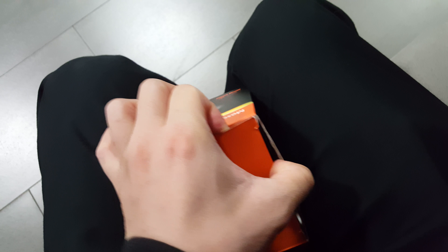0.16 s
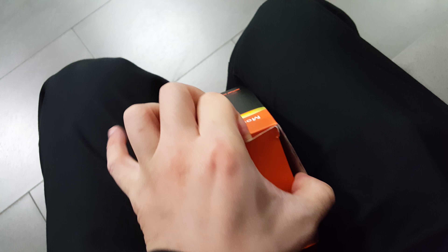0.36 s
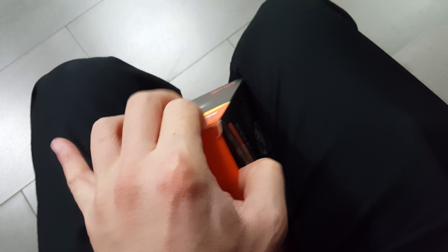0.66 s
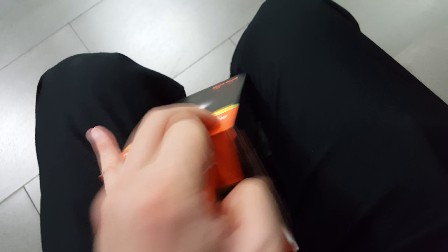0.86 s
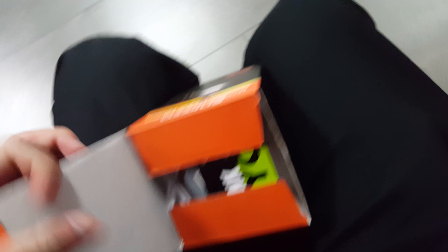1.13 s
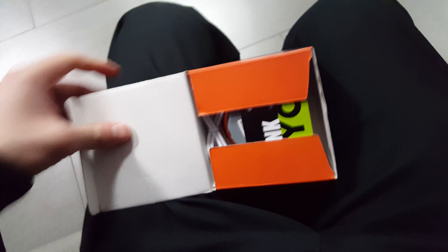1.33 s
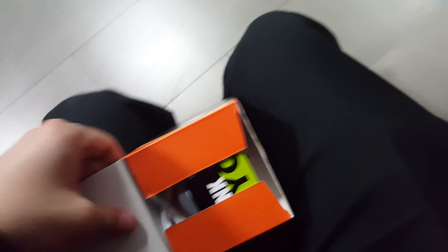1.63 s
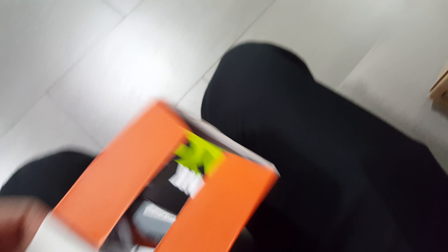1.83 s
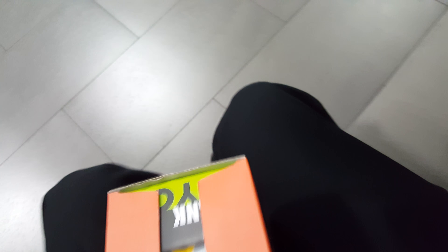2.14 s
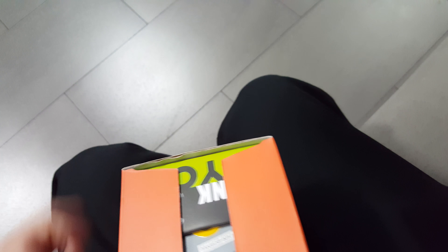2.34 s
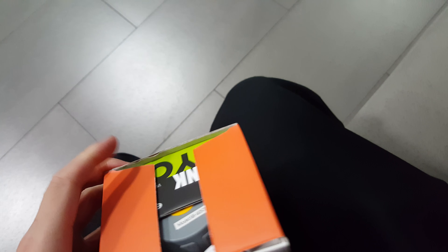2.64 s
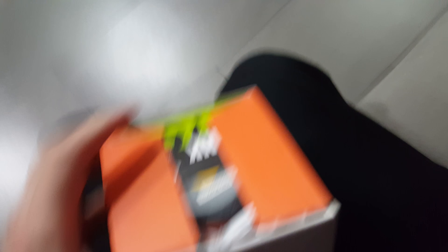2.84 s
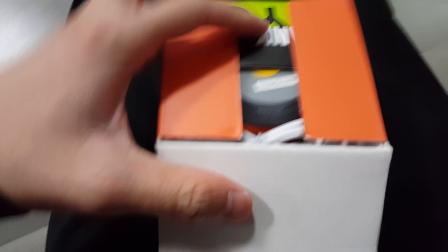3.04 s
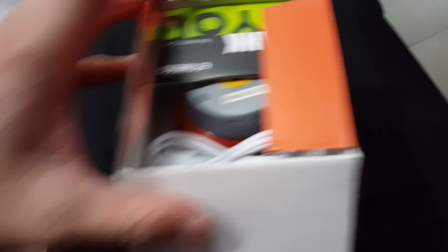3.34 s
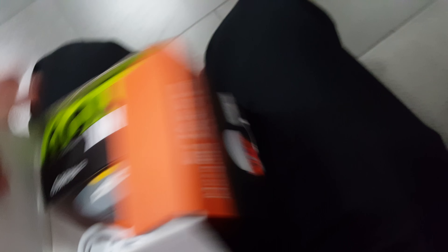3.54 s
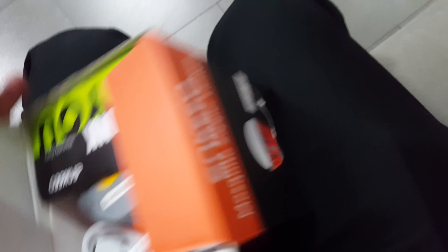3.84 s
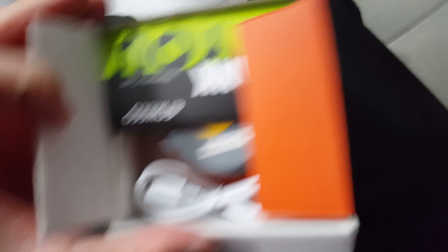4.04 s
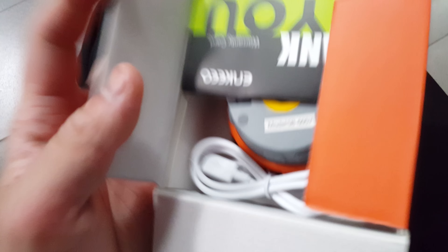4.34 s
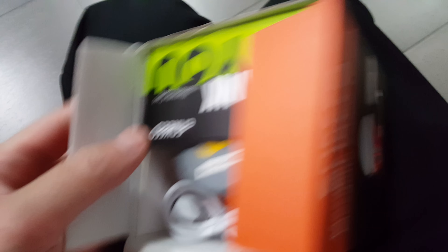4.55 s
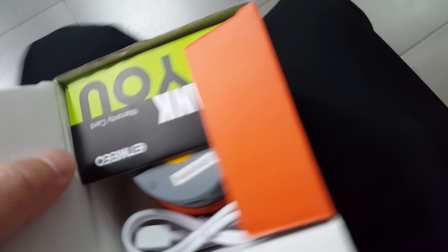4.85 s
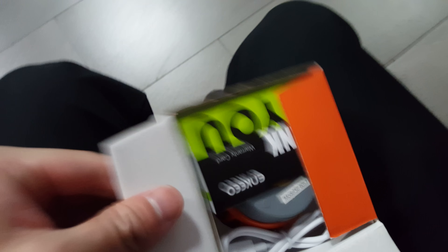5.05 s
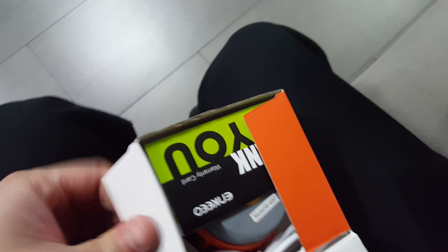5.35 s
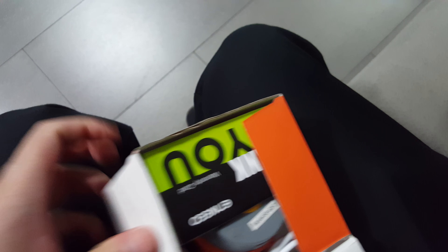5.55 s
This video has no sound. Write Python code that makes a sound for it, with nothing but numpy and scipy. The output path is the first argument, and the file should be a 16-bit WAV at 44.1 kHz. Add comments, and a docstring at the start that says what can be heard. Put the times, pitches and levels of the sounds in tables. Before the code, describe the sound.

Fingers rub and flick stiff card flaps in a quiet room, a dense burst near one second, then scattered scuffs, clicks and a fold creak.

```python
"""A small cardboard box is opened on the lap, close to two microphone ports.
From the start fingers and flaps rub the card (dense slips and noise coloured by the card) over a quiet room
rumble (filtered noise). From 0.1 s edges scuff, and flaps slip, snap and knock (noisy forces that ring modes).
From 0.9 s edges squeak now and then (gliding tones); at 5.3 s a fold creaks (a train of jolts), then
a few last knocks fall. A short dull reverberation (sparse taps) follows all the near sounds."""
import sys
import numpy as np
from scipy import signal
from scipy.fft import rfft, irfft
from scipy.io import wavfile
from scipy.ndimage import uniform_filter1d

SR = 44100
rng = np.random.default_rng(int(sys.argv[2]) if len(sys.argv) > 2 else 0)


def generate_wav(signal):
    """Clip the signal to [-1, 1] and save it as 16-bit WAV at the path in sys.argv[1]."""
    frames = np.transpose(np.atleast_2d(signal))
    scaled = np.clip(frames, -1, 1) * 32767
    pcm = np.round(scaled).astype(np.int16)
    wavfile.write(sys.argv[1], SR, pcm)


N = 250929  # length in samples
SPLIT_HZ = 2500  # border of snap and crack; the drifting balance of the rub is full above it
LEAD_S = 0.00014  # the left port is nearer
# borders of the broad bands: edge [Hz]
BAND_EDGES_HZ = (400, 1200, 5000)


def gain_of(db):
    """Level law: decibels to amplitude."""
    return 10 ** (np.asarray(db) / 20)


def evened(x):
    """Normalisation: scales to rms 1."""
    return x / np.sqrt(np.mean(x ** 2) + 1e-20)


def read(points, hz):
    """Interpolation of a spectrum on a log-frequency axis."""
    f, value = np.transpose(points)
    return np.interp(np.log(hz + 1), np.log(f + 1), value)


def add(mix, s, sound):
    """Superposition: mixes a sound in at time s."""
    part = mix[:, round(s * SR):][:, :sound.shape[1]]
    part += sound[:, :part.shape[1]]


def shaped(x, field_db, size=256):
    """Time-varying filtering: a level field over frequency and time weights the short-time spectrum."""
    overlap = size * 3 // 4
    hz, t, z = signal.stft(x, SR, nperseg=size, noverlap=overlap)
    _, y = signal.istft(z * gain_of(field_db(hz, t)), SR, nperseg=size, noverlap=overlap)
    return y[..., :N]


def patches(shape, wide, long):
    """Smoothed randomness: blotches over frequency and time, rms 1."""
    z = rng.standard_normal(shape[::-1]).T
    z = uniform_filter1d(z, max(round(wide), 1), 0)
    return evened(uniform_filter1d(z, max(round(long), 1), 1))


# likeness of the two ports: pitch_hz [Hz], likeness [0 to 1]
PORT_LIKENESS = [(60, 0.97), (300, 0.96), (700, 0.88), (1400, 1), (3000, 0.05), (6000, 0.033),
                 (15000, 0.17)]


def pair(x):
    """Coherence: two noises become two ports, alike in the bass and mostly unlike in the treble."""
    n = x.shape[1]
    same = np.clip(read(PORT_LIKENESS, np.fft.rfftfreq(n, 1 / SR)), 0, 1)
    a, b = rfft(x)
    return irfft(np.array([a, same * a + np.sqrt(1 - same ** 2) * b]), n)


# points on the changing level and hiss of one continuous rub of fingers and flaps over the card:
# at_s [s], scrape level_db [dB], hiss [dB relative to scrape]
RUB_CURVE = [(0, -57.5, 1), (.22, -57.5, 1), (.49, -53.5, -2), (.63, -47.5, 1), (.86, -60, 7),
             (.9, -42.5, 7), (1.33, -50, -0.5), (1.43, -55, -3.5), (1.57, -47.5, 1.5), (1.77, -49.5, 1),
             (2.04, -43.5, 3.5), (2.17, -55, 2), (2.47, -51, -2), (2.66, -59, 1), (2.74, -62, -4.5),
             (2.84, -55.5, 1.5), (3.15, -54.5, -2), (3.28, -58.5, -7.5), (3.43, -60, 3), (3.61, -52, 6),
             (3.82, -50, 1.5), (4.17, -55.5, 0), (4.29, -49, 2), (4.42, -43, 0.5), (4.62, -48.5, 4.5),
             (4.83, -57, 3), (5.19, -47.5, -2), (5.24, -56, -2), (5.47, -52.5, 2), (5.58, -63, -2.5),
             (5.69, -58, -4)]
# scuffs of an edge past an edge: start_s [s], length_s [s], scrape level_db [dB],
# body [dB relative to scrape], edge pitch_hz [Hz]
EDGE_SCUFFS = [(0.103, 0.23, -49.5, -1.5, 2050), (0.287, 0.16, -50, -2, 2200), (0.578, 0.35, -47, -1, 2700),
               (0.869, 0.06, -31.5, 2.5, 2440), (0.93, 0.031, -30.5, 3.5, 2920),
               (0.968, 0.2, -38.5, -2, 3380), (1.089, 0.0099, -34, -20, 4450),
               (1.345, 0.095, -50, -4, 3470), (1.45, 0.092, -56.5, 7, 2270),
               (1.538, 0.065, -45.5, -19, 2800), (1.593, 0.045, -37.5, -8.5, 3640),
               (1.66, 0.075, -46, -6, 1390), (1.833, 0.067, -43.5, -3.5, 2200),
               (1.944, 0.042, -49.5, 15, 2000), (1.956, 0.13, -46.5, -1.5, 4700),
               (1.97, 0.046, -55, -10, 5900), (2.091, 0.025, -43, -10, 3760),
               (2.158, 0.082, -43.5, -7.5, 4000), (3.009, 0.21, -46.5, -9.5, 1970),
               (3.318, 0.095, -49, -9.5, 4700), (3.64, 0.099, -47.5, -5, 2200),
               (3.696, 0.042, -36, -20, 3100), (3.764, 0.059, -42, -25, 3080),
               (3.814, 0.093, -46.5, -14, 2700), (3.988, 0.023, -38.5, -16, 1800),
               (4.044, 0.05, -45.5, -0.5, 2400), (4.216, 0.011, -46, -6, 4200),
               (4.63, 0.026, -34, -2.5, 4170), (4.669, 0.053, -39, -8, 1880),
               (4.925, 0.12, -46.5, -14, 2850), (5.073, 0.1, -44.5, -3, 2490),
               (5.154, 0.023, -35, -16, 5500), (5.176, 0.036, -40, -4.5, 5450),
               (5.242, 0.092, -49, 10, 3130), (5.444, 0.03, -43.5, -8, 3000),
               (5.629, 0.043, -53.5, -14, 2000), (5.683, 0.015, -47, -5, 2000)]
# colour of rubbed card, relative within each band: pitch_hz [Hz], level_db [dB per Hz]
CARD_COLOUR = [(150, -5.5), (250, 19.5), (292, -7), (336, -2.5), (400, -7.5), (576, -1.5), (1350, -8.5),
               (2760, -9), (3460, -12.5), (4260, -11), (6940, -12), (13900, -15), (16000, -13)]
# slow drift of the rubbing's balance and top treble, as points on a curve:
# at_s [s], side [left-right dB], level_db of the top treble [dB]
RUB_DRIFT = [(0.0, -6.5, -3.5), (1.01, -7, -4), (1.2, -2.5, 1.5), (1.3, -8.5, 0.5), (2.06, -5.5, -5),
             (2.08, -8, -3.5), (3.15, -5, -2), (3.25, -15, 6), (3.39, -4, -5), (3.45, -12.5, -1),
             (3.71, -2.5, -5), (4.28, -8.5, -1.5), (4.8, -3.5, -3), (5.05, -6, -2), (5.07, -11, 1),
             (5.25, -5, -7), (5.66, -3.5, 1), (5.69, -5, -1)]
BODY_DB = -3.5  # dull body of the rub, relative to its scrape
HISS_DB = -0.5  # hiss of a scuff, relative to its scrape
CENTRE_DB = -5  # left-right dB that the ports give a sound in the middle
PATCH_HZ, TOP_HZ = 2700, 9500  # centre of a broad 1 dB boost; the top treble is full from here up


def card_slips():
    """Friction as a random process: uneven impulses over smooth noise, clumped in time."""
    size = gain_of(2.2 * np.minimum(rng.exponential(1, N), 5))
    size *= rng.random(N) < 3000 / SR  # about 3000 slips a second
    clumps = gain_of(1.09 * evened(uniform_filter1d(rng.standard_normal(N), size=130)))
    impulses = evened(size * rng.choice([-1, 1], (2, N)))
    return evened(pair(0.65 * impulses + rng.standard_normal((2, N))) * clumps)


def rubbing():
    """Source-filter principle: dense slips excite the card; body, scrape and hiss follow the rub and its scuffs."""
    s, scrape_db, hiss_db = np.transpose(RUB_CURVE)

    def field_db(hz, t):
        """Power addition: rub and scuffs add, then card colour, slow drift and random flicker apply."""
        colour = read(CARD_COLOUR, hz)
        band = np.digitize(hz, BAND_EDGES_HZ[1:])  # body, scrape, hiss
        power_of_band = [np.sum(gain_of(2 * colour[band == k])) / len(hz) for k in range(3)]
        share_db = 10 * np.log10(np.array(power_of_band))

        def spread(levels_db):
            """Smooths the band levels across frequency, as power."""
            return gain_of(2 * uniform_filter1d((levels_db - share_db[:, None])[band], size=5, axis=0))

        def hump(pitch_hz, db, octaves):
            """A Gaussian resonance on the octave axis, as power."""
            distance = np.log2((hz[:, None] + 1) / pitch_hz) / octaves
            return gain_of(2 * db * np.exp(-distance ** 2))

        rub = [np.interp(t, s, scrape_db + rel_db) for rel_db in (BODY_DB, 0, hiss_db)]
        power = spread(np.array(rub)) * hump(PATCH_HZ, 1.0, 1.0)
        for start, length, scrape, body, edge_hz in EDGE_SCUFFS:
            stroke = np.sin(np.pi * np.clip((t - start) / length, 0, 1)) ** 2
            whistle = hump(edge_hz, 0.19 / length, 0.087)  # the quicker the flick, the clearer its pitch
            power = power + spread(scrape + np.array([[body], [0], [HISS_DB]])) * whistle * stroke
        at, pan_db, top_db = np.transpose(RUB_DRIFT)
        side_db = np.outer(np.clip(hz / SPLIT_HZ, 0, 1), np.interp(t, at, pan_db - CENTRE_DB)) / 2
        top_db = np.outer(np.clip(hz / TOP_HZ * 5 - 4, 0, 1), np.interp(t, at, top_db))
        flicker_db = 2.13 * patches(power.shape, 4, 26.5)
        field = colour[:, None] + 10 * np.log10(power) + top_db + flicker_db
        return np.array([field + side_db, field - side_db])

    return shaped(card_slips(), field_db)


# relative spectrum of room and microphone noise: pitch_hz [Hz], level_db [dB per Hz]
HUM_COLOUR = [(12, -36), (20, -63), (49, 22.5), (142, 16.5), (177, -37), (388, -8), (422, -25), (759, -39),
              (1290, -70), (3950, -29), (11800, -21.5), (14700, -16), (16000, -40)]
# relative spectrum of the rumble: pitch_hz [Hz], level_db [dB per Hz]
RUMBLE_COLOUR = [(20, -54), (50, 3.5), (85, 2), (200, -4.5), (350, -14.5), (700, -58)]
HUM_DB, RUMBLE_DB = -50, -52.5  # rms of the steady noise and of the room's steady rumble, before the ports
HANDLING_DB = -4  # rumble of hand and lap, relative to the scrape


def background():
    """Stationary filtered noise of room and microphone, plus a rumble whose power rises with the rub."""
    def steady(hz, t):
        return read(HUM_COLOUR, hz)[:, None] + 0 * t

    def heave(hz, t):
        return read(RUMBLE_COLOUR, hz)[:, None] + 4.1 * patches((len(hz), len(t)), 2, 3)

    hum = shaped(pair(rng.standard_normal((2, N))), steady, size=2048)
    rumble = shaped(pair(rng.standard_normal((2, N))), heave, size=2048)
    s, scrape_db, _ = np.transpose(RUB_CURVE)
    handling = gain_of(HANDLING_DB + np.interp(np.arange(N) / SR, s, scrape_db))
    return gain_of(HUM_DB) * evened(hum) + evened(rumble) * np.hypot(gain_of(RUMBLE_DB), handling)


# slips, snaps and knocks: start_s [s], snap peak level_db [dB], thud, knock and crack [dB relative to snap],
# tick [dB relative to crack], flap pitch_hz [Hz], edge pitch_hz [Hz], contact [ms, time constant],
# side [left-right dB, of which each band takes a share]
FLAP_BLOWS = [(.098, -55.5, 8, 3, -13, -8, 600, 1500, 1.4, 2),
              (0.35, -48.5, 2, 4.5, -10, -8, 607, 2600, 2.1, 0),
              (0.542, -48, 8, 2.5, -14, -8, 790, 2640, 2.8, 0),
              (0.5862, -42, 1, 0, -11, -9, 1090, 2970, 1.25, -3),
              (0.615, -37.5, -20, -3.5, -0.5, -7, 2000, 2660, 0.77, -14),
              (0.7015, -33, -22, -22, -0.5, -10, 2150, 2730, 0.91, -9),
              (0.7268, -35, -32, -11, -2, -14, 2200, 2780, 1.2, -6),
              (0.8792, -28, -12, 0, -6, 2.5, 915, 2540, 4.3, -10),
              (.8884, -39, 14, -4, -15, 5, 610, 2600, 1.8, -4),
              (0.901, -42, -7, -4, -3, -11, 570, 2500, 1.5, 0),
              (0.902, -27, 2, -5, -7, 4.5, 608, 2480, 1, 0),
              (0.9134, -21.5, -4, -1.5, -2.5, -1.5, 540, 6800, 1.23, -17),
              (0.9157, -26.5, 5, -5, 0, -14, 1800, 2590, 1.8, -1),
              (0.9245, -26.5, -12, 2, -9, -22, 640, 3040, 1, -2),
              (0.9421, -23.5, -4, 2, -2.5, -2, 580, 2830, 1.7, 0),
              (0.9442, -30.5, 16.5, 6.5, -10, -14, 179, 3830, 2.4, -8),
              (0.9556, -33, 7, 1, -19, -13, 320, 2700, 2.1, -3),
              (.961, -31.5, -1, -5, 2.5, -21, 536, 2440, 1.74, 2),
              (0.9757, -27.5, -8, 4, -16, -15, 580, 3000, 1.57, -6),
              (0.9894, -34, -1, -5, 0, -17, 2000, 2590, 1.1, 5),
              (1.0214, -27, -10, -4, 1.5, -16, 2400, 3080, 0.38, -6),
              (1.0872, -32, -7, -8, 5, -9, 1930, 4770, 1.36, -1),
              (1.255, -37.5, -19, -17, 4, -7, 2450, 12800, 0.57, -3),
              (1.3045, -27, -39, -9.5, -5.5, -17.5, 2030, 2750, 0.85, -10),
              (1.3112, -34, 2, -14, 0, -12, 2780, 3900, 1.46, -8),
              (1.3746, -38.5, -4, -5, 3, -17, 2000, 4740, 0.83, -4),
              (1.3868, -42.5, -8, -14, 3, -15, 2000, 4740, 0.84, 0),
              (1.4502, -27.5, -28, -17, -2, -13, 2060, 2760, 1.45, -11),
              (1.4711, -33.5, -12, -11, -3.5, -11, 2270, 2780, 1.6, -2),
              (1.4856, -34, -25, -5, -13, -6, 750, 2820, 1.22, -12),
              (1.5708, -32, -10, -12, 0, -3, 1950, 2620, 0.78, 2),
              (1.5972, -40, -2, -9, -4, -17, 1030, 4740, 1.7, -2),
              (1.6123, -27, -14, 3, -13, -8, 960, 2610, 1.14, 1),
              (1.6253, -33, -7, -16, -1, -20, 1040, 3700, 2.3, -3),
              (1.688, -27, -19, -16, -8, -19, 1370, 2650, 0.92, -9),
              (1.7, -32.5, -12, -8, -12, -23, 1410, 2620, 2.5, 0),
              (1.751, -38, -24, -3, -11, -19, 910, 2700, 3.2, -3),
              (1.916, -35.5, -6, -4.5, -12, -1, 1790, 4090, 1.9, -1),
              (1.9461, -37, -23, -1, -2, -15, 770, 4090, 2.5, -1),
              (1.9562, -33, -4, 1, -13, -12, 786, 2850, 1.77, 3),
              (2.0323, -35, -19, 3, 3.5, -10, 860, 4550, 1, 14),
              (2.047, -49, 11, 0, 2, -12, 600, 2700, 3, 5),
              (2.0865, -42.5, -8, 0, 13, -11, 2140, 4360, 1.8, 2),
              (2.0903, -45.5, 11, 12.5, -10, -10, 368, 2700, 1.43, 4),
              (2.123, -36, -22, -10, -5, -20, 1050, 1580, 1.28, -1),
              (2.141, -55, 16, -8, 0, -15, 600, 2700, 2.9, 7),
              (2.4613, -40, -3.5, 2, -16, -8, 820, 3120, 1.8, 10),
              (2.5145, -30.5, -3, -2.5, -6.5, -7.5, 660, 2560, 1.11, -1),
              (2.5713, -44, -16, -2.5, -3.5, -19, 2010, 2710, 1.56, 0),
              (2.65, -25, -9, -10, -2, -10, 2130, 3820, 1, -13),
              (2.6534, -41.5, 2.5, 12.5, -13, -23, 724, 2800, 1.73, 6),
              (3.031, -39.5, -3, 2.5, -15, -2, 850, 3000, 1.3, 3),
              (3.069, -39, -3, -5.5, -14, -5, 1440, 3070, 1.42, -5),
              (3.1536, -38, -17, 7, -3.5, -7, 617, 2700, 1.9, 3),
              (3.3836, -34.5, -6, 1, -8, -5, 375, 4200, 1.2, 6),
              (3.391, -38, -5, -1.5, -20, -8, 830, 1680, 2.28, 5),
              (3.401, -54, 9, 5, -11, -10, 397, 1700, 2.8, 2),
              (3.675, -37.5, -14, -16, -6, -2, 1300, 3880, 3.6, 0),
              (3.7088, -42, -22, -22, 3, -4, 2000, 3600, 0.93, 10),
              (3.7154, -30, -27, -19, 3.5, -13, 1900, 2980, 0.77, -2),
              (3.732, -33, -23, -17, 3, -9, 1840, 3550, .7, 7),
              (3.739, -39, -18, -23, -4, -10, 1800, 3000, 0.92, 7),
              (3.8026, -38.5, -18, -22, 2, -7, 2000, 4200, 1.13, 7),
              (3.8593, -38.5, -5, 0.5, -12, -17, 794, 2840, 2.16, 7),
              (4.002, -29, -20, -13.5, -1.5, -19, 1770, 3120, 0.77, 3),
              (4.0634, -40, -7, -12, 1.5, -18, 2380, 3620, 1.06, -5),
              (4.2777, -43.5, 4.5, 7, -2, -13, 514, 4360, 1.53, 4),
              (4.5398, -39.5, -19, -9, 3, -7, 1830, 4100, 0.89, -3),
              (4.6368, -37, 8, -4.5, -10, -11, 210, 2460, 1.47, 11),
              (4.6451, -28.5, -12, -15, 3, -18, 1950, 4140, 1.05, 0),
              (4.6811, -47, 5, 5, 1, -10, 378, 2700, 1.1, 2),
              (4.6866, -33.5, -22, -19, -1, -16, 1770, 4050, 0.75, 15),
              (4.7003, -34.5, -8, -6, 0, -12, 2100, 3300, 1.7, 7),
              (4.713, -50, 7, 3, -9, -10, 1050, 2700, 2, 12),
              (4.7656, -21.5, -28, -23, 0, -5.5, 1760, 4900, 0.59, 0),
              (4.77, -39.5, -6, 0.5, -3, -15, 1570, 2740, 1.38, 19),
              (4.87, -52, 10, -1, -7, -13, 1500, 2600, 0.49, 2),
              (4.889, -51, 6, -1, -4, -10, 1500, 2600, .7, 0),
              (4.9061, -43.5, -1, -4, 0, -10, 2040, 2480, 0.62, 12),
              (4.928, -40, 1.5, -4, 2, -12, 2420, 2880, 0.75, 6),
              (4.9748, -41.5, 2.5, -2, -9, -8, 1030, 2960, 1.24, 3),
              (5.0856, -28, -5, -4, 2.5, -11.5, 1930, 4600, 0.85, -9),
              (5.1223, -39, -7, -10, -3, 1, 1700, 4230, 1.2, -4),
              (5.3884, -39, -16, -9, 0.5, -19, 910, 2960, 1.03, -1),
              (5.3905, -32, -5.5, 0, -16.5, 5, 940, 2250, 0.66, -4),
              (5.4053, -28, -7, -3.5, -13, -7, 960, 2200, 0.55, -2),
              (5.6235, -30.5, -12, -6, -6.5, -14.5, 630, 1880, 0.98, -8),
              (5.627, -46.5, 12, -5, -11, -10, 294, 2270, 1.34, -1)]
# modes of the box, panels and flaps, as struck by a blow on average: pitch_hz [Hz], level_db [dB], t60_s [s]
BOX_MODES = [(90, -3, 0.063), (143, 7.5, 0.027), (197, 13, 0.057), (254, 8, 0.063), (311, 10.5, 0.029),
             (460, 7, 0.014), (608, -2, 0.032), (805, -0.5, 0.042), (960, 0, 0.026), (1324, 2, 0.013),
             (1770, 6, 0.015), (2200, 2.5, 0.022), (2750, -22, 0.0023), (2960, 0.5, 0.028),
             (4000, 0, 0.011), (4760, 26.5, 0.00047), (6700, 2.5, 0.0095), (8500, 11, 0.003),
             (8200, -10, 0.0058), (10900, 2.5, 0.0028), (13300, 9, 0.0011)]
TICK_HZ = 6000  # lower border of the tick
JOLT, JOLT_AT = 1.14, 1.171  # size of the jolt, and its place in contact times


def blows():
    """Modal synthesis: slips and one jolt during contact ring the free flap, its edge and the box modes."""
    hz, db, t60 = np.transpose(BOX_MODES)[:, :, None]
    low, mid = BAND_EDGES_HZ[:2]
    filters = [signal.butter(order, edge, kind, fs=SR, output="sos") for order, edge, kind in (
        (3, (mid, SPLIT_HZ), "band"),  # snap
        (2, (85, low), "band"),  # thud
        (3, (low, mid), "band"),  # knock
        (3, (SPLIT_HZ, TICK_HZ), "band"),  # crack
        (3, TICK_HZ, "high"))]  # tick
    side_shares = [0.15, 0.41, 0.0026, 0.095, 0.32]  # in the order of the filters
    t, out = np.arange(3072) / SR, np.zeros((2, N))
    for row in FLAP_BLOWS:
        s, snap_db, thud_db, knock_db, crack_db, tick_db, flap_hz, edge_hz, contact_ms, side_db = row
        # each blow lands on another spot, so the modes shift a little
        weight, detune = rng.standard_normal((2, len(hz), 1))
        mode_hz = hz * (1 + 0.068 * detune)
        modes = gain_of(db + 2.2 * weight - 60 * t / t60) * np.sin(2 * np.pi * mode_hz * t)
        # flap and edge fall 60 dB in 11 and 17 cycles
        flap = gain_of(17 - 60 * t * flap_hz / 11) * np.sin(2 * np.pi * flap_hz * t)
        edge = gain_of(14.5 - 60 * t * edge_hz / 17) * np.sin(2 * np.pi * edge_hz * t)
        u = t * 1000 / contact_ms
        slips = pair(rng.standard_normal((2, len(t)))) * u ** 1.195 * np.exp(-u)
        jolt = JOLT * np.exp(-((u - JOLT_AT) * contact_ms * SR / 1000) ** 2)  # about a sample wide
        force = slips + jolt
        body = (modes.sum(0) + flap + edge)[None]
        ring = signal.fftconvolve(force, body, axes=1)[:, :len(t)] + 3.3 * force
        levels_db = snap_db + np.array([0, thud_db, knock_db, crack_db, crack_db + tick_db])
        for sos, level_db, share in zip(filters, levels_db, side_shares):
            part = signal.sosfilt(sos, ring)
            peak = np.sqrt(uniform_filter1d((part ** 2).mean(0), size=130).max())  # 3 ms rms
            half_db = side_db / 2 * share * np.array([[1], [-1]])
            add(out, s, gain_of(level_db + half_db) * part / peak)
    return out


# an edge squeaks as it slides: start_s [s], length_s [s], first pitch_hz [Hz], last pitch_hz [Hz],
# peak level_db [dB, before flutter]
EDGE_SQUEAKS = [(0.888, 0.034, 573, 626, -27), (1.091, 0.0075, 3350, 3230, -22.5),
                (1.522, .009, 890, 875, -39), (1.534, 0.0071, 1000, 1500, -40),
                (1.541, .012, 1700, 1750, -37), (1.721, 0.025, 1380, 1340, -34.5),
                (1.746, .009, 1350, 1240, -34.5), (2.122, .007, 1010, 1030, -33.5),
                (4.686, .008, 1710, 1900, -32), (4.694, 0.013, 735, 990, -33.5),
                (5.453, 0.0098, 2990, 3050, -40.5), (5.467, .008, 2000, 2310, -39)]
SQUEAK_WAVER, SQUEAK_FLUTTER_DB = .03, 2.5  # rms pitch deviation as a fraction; rms level deviation


def squeaks():
    """Frequency and amplitude modulation: a wavering tone swells quickly, glides and dies."""
    out = np.zeros((2, N))
    for s, length, first_hz, last_hz, peak_db in EDGE_SQUEAKS:
        u = np.arange(0, length, 1 / SR)[:2048] / length
        chance = rng.standard_normal((2, 2048))
        waver, flutter = (evened(uniform_filter1d(row, size=40))[:len(u)] for row in chance)
        hz = (first_hz + (last_hz - first_hz) * u) * (1 + SQUEAK_WAVER * waver)
        swell = np.sin(np.pi * np.sqrt(u)) * gain_of(peak_db + SQUEAK_FLUTTER_DB * flutter)
        late = np.outer([1, -1], np.pi * hz * LEAD_S)  # the edge is as far from either port
        add(out, s, swell * np.sin(2 * np.pi * np.cumsum(hz) / SR - late))
    return out


# a fold sticks and lets go: release_s [s, the moment it lets go, just after its grating],
# jolt-and-ring peak level_db [dB],
# grating [dB relative to that peak, before a common 9 dB cut and a band filter]
FOLD_CREAKS = [(5.267, -22, 5), (5.2753, -22, 1), (5.2832, -20, -3), (5.2934, -19.5, -2),
               (5.3021, -14.5, -6), (5.312, -21, 2), (5.32, -20.5, -11)]
FOLD_HZ, FOLD_T60_S = 2000, 0.014


def creak():
    """Stick-slip: each release is a sharp jolt after a short high grating; fold and held box ring briefly."""
    hz, db, t60 = np.transpose(BOX_MODES)[:, :, None]
    t, lead, out = np.arange(2048) / SR, .003, np.zeros((2, N))  # lead: seconds before the release
    after = t - lead
    # holding the box halves its decay times
    held = (gain_of(db - 60 * t / (.5 * t60)) * np.sin(2 * np.pi * hz * t)).sum(0)
    jolt = np.cos(2 * np.pi * 1500 * after) * np.exp(-abs(after) / .0002)
    fold = (t > lead) * np.cos(2 * np.pi * FOLD_HZ * after) * gain_of(-60 * after / FOLD_T60_S)
    ring = jolt + 0.24 * fold + 0.0052 * signal.fftconvolve(jolt, held)[:len(t)]
    high = signal.butter(2, (3000, 4800), "band", fs=SR, output="sos")
    for release, level_db, grating_db in FOLD_CREAKS:
        grit = rng.standard_normal((2, len(t)))
        grating = signal.sosfilt(high, pair(grit)) * np.exp(-((t - .0018) / 0.0006) ** 2)
        grating *= gain_of(grating_db - 9.0)
        # a dull rattle dies away after the release
        rattle = signal.lfilter([1, -1], [1, -1.78, .79], pair(grit[::-1]))
        rattle *= 0.083 * (t > lead) * np.exp(-t / 0.0069)
        add(out, release - lead, gain_of(level_db) * (ring / ring.max() + grating + rattle))
    return out


def taps(start, t60, count):
    """Sparse reverberation: taps of random sign, one in every 20 samples, die away; one set a channel."""
    out = np.zeros((2, start + 20 * count))
    at = start + 20 * np.arange(count) + rng.integers(0, 20, (2, count))
    np.put_along_axis(out, at, rng.choice([-1., 1.], at.shape) * gain_of(-60 * at / SR / t60), 1)
    return out / np.linalg.norm(out[0])


def scene():
    """Direct and reverberant field: near sounds, a little dull room and the background."""
    near = rubbing() + blows() + squeaks() + creak()
    room = signal.fftconvolve(near, taps(200, 0.15, count=600), axes=1)[:, :N]
    room = signal.lfilter([.3], [1, -.7], room)  # walls and cloth swallow the treble
    return near + gain_of(-12.5) * room + background()


# level difference of the ports: pitch_hz [Hz], level_db [left-right dB]
PORT_BALANCE = [(60, 3.5), (110, -1), (200, 1.5), (380, 0.5), (700, 0.5), (1290, -1.5), (2380, -4.5),
                (4400, -9.5), (8120, -0.5), (15000, -6)]
TOP_EDGE_HZ = 15850  # band limit


def record(dry):
    """Linear filtering: the ports differ in arrival time and level over frequency; then the band limit."""
    hz = np.fft.rfftfreq(N, 1 / SR)
    half = gain_of(read(PORT_BALANCE, hz) / 2) * np.exp(1j * np.pi * hz * LEAD_S)
    # common response: (Hz, dB)
    response = [(30, -15), (60, -6.5), (300, 0), (1500, -1.5), (4000, 0.5), (15000, -4.5)]
    ports = irfft(rfft(dry) * np.array([half, 1 / half]) * gain_of(read(response, hz)), N)
    lowpass = signal.firwin(511, TOP_EDGE_HZ, window=("kaiser", 9), fs=SR)
    return signal.oaconvolve(ports, lowpass[None], "same")


dry = scene()
out = record(dry)
generate_wav(out)
```